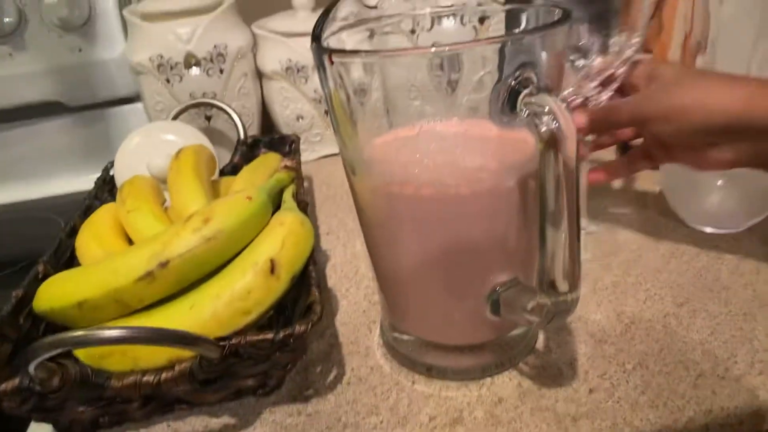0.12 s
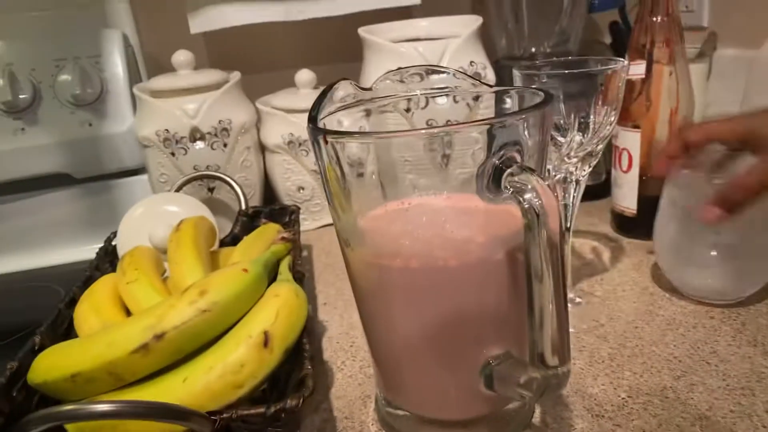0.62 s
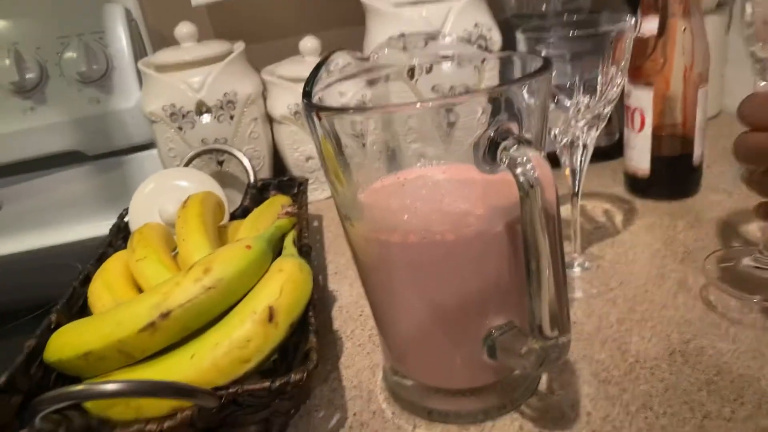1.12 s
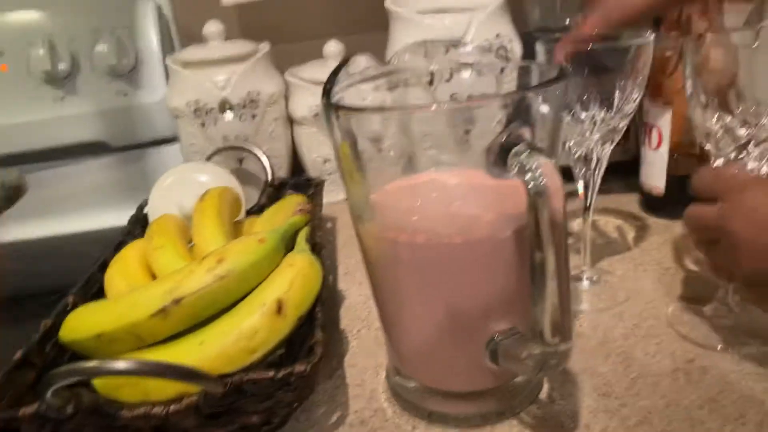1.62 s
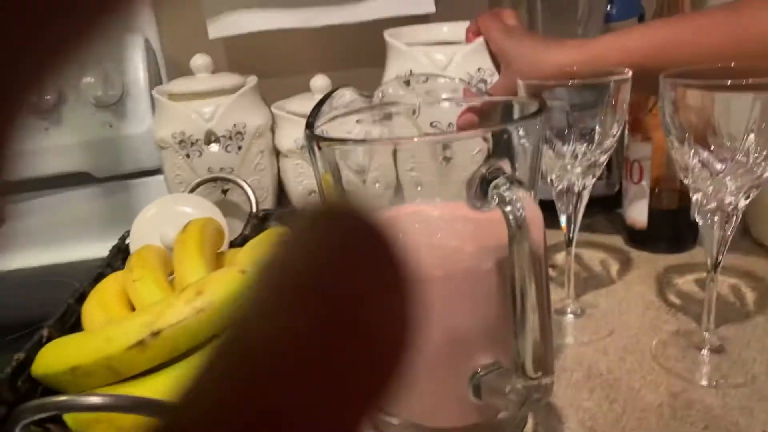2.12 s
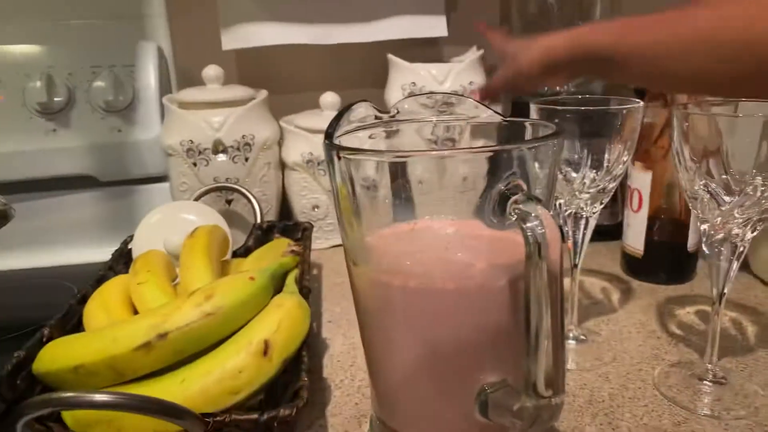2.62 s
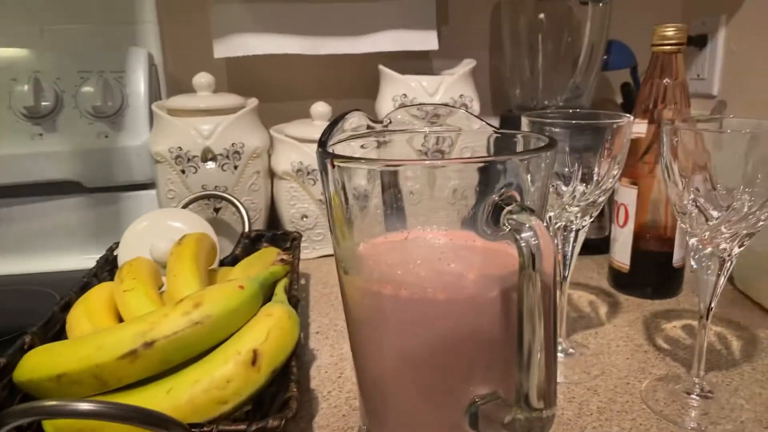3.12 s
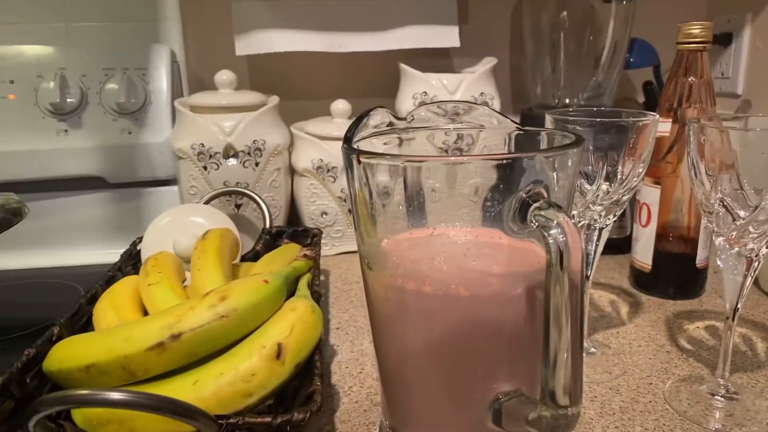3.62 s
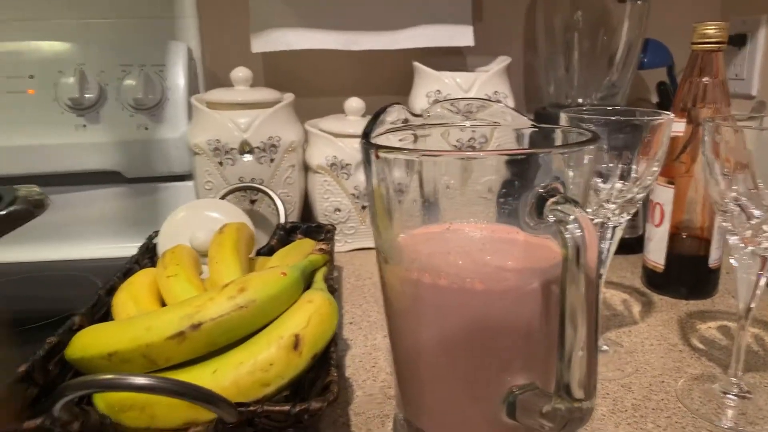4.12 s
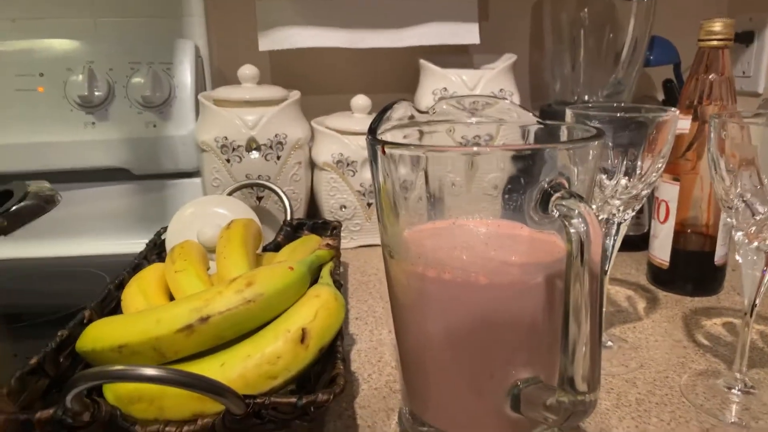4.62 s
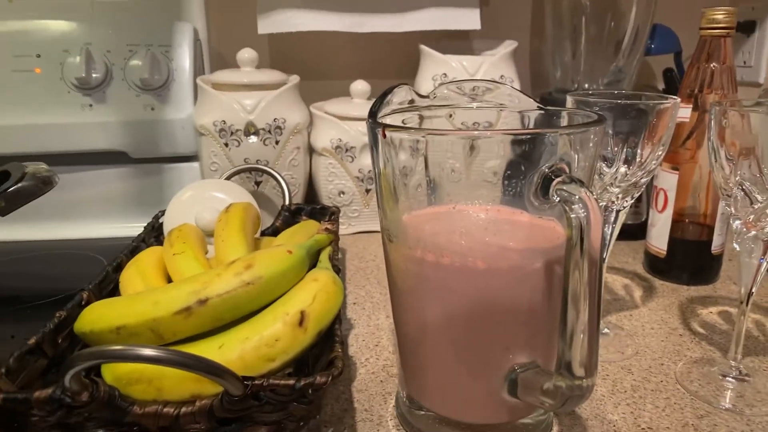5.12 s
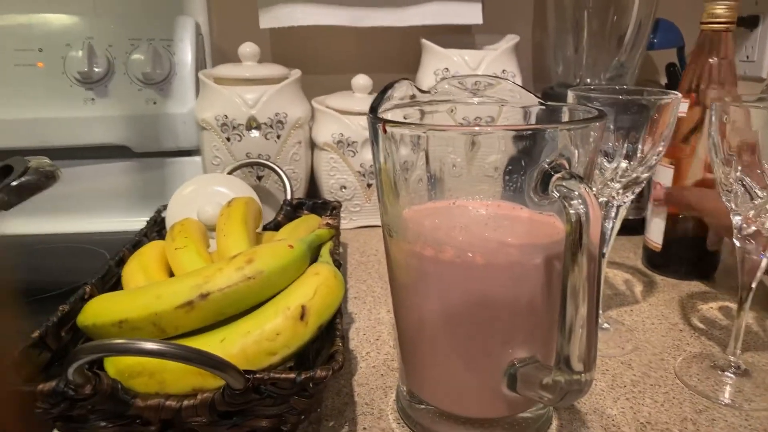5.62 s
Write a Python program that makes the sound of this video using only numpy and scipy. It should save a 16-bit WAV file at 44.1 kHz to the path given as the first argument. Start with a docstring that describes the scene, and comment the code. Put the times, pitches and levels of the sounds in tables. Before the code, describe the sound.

In a small hard kitchen, glass slides briefly on a countertop, then a bowl drags with a grainy scrape. A loud, sharp glass set-down knocks and clinks just after one second. A jar scrapes and thumps soon after two seconds. Small ticks and faint cloth rustles follow, ending with a slight bottle scrape. Close mono microphone, low appliance hum behind.

```python
"""Glassware on a kitchen counter

Close mono microphone in a small hard room: stemmed glasses, a bowl, a jar and a bottle are slid and set down.
Knocks ring the hollow counter boards and the glass; drags send stick-slip noise through each object's resonances.
Low bumps are decaying sines; dry ticks, light knocks of the bowl and rustling clothes are shaped noise.
Behind them lie coloured air noise and an appliance hum of narrow, wavering noise bands."""
import sys
import numpy as np
from scipy import signal
from scipy.fft import rfft, irfft
from scipy.io import wavfile

SR = 44100
rng = np.random.default_rng(int(sys.argv[2]) if len(sys.argv) > 2 else 0)


def to_wav(sig):
    """Store sig (one row per channel, or 1-D mono) as 16-bit WAV at the path in sys.argv[1].

    Samples outside -1..1 are clipped; the rate is SR.
    """
    pcm = np.clip(np.atleast_2d(sig), -1, 1) * 32767
    pcm = np.round(pcm).astype(np.int16)
    wavfile.write(sys.argv[1], SR, pcm.T)  # frames by channels


def gain_from_db(level_db):
    """Turn a decibel level (scalar or array-like) into a linear amplitude factor."""
    decades = np.asarray(level_db, float) / 20
    return 10 ** decades


N = 253847   # length in samples

# Levels are relative, ahead of the mix and the microphone.
# knocks on the counter: t/s, splash level/dB, thud level/dB, splash decay time/ms
KNOCKS = [(0.0214, -26.5, -26, 5), (0.1094, -24.5, -28, 10), (1.1804, -18.5, -10, 14),
          (1.1898, 10.5, -10, 1.66), (1.2381, -8, -21, 3.1), (1.2873, -15, -24.5, 4.3),
          (1.3496, -26.5, -33, 4.4), (1.404, -18, -27, 4.3), (1.4138, -13, -23.5, 4.6),
          (1.4896, -34.5, -37, 6), (1.7565, -35, -26, 2.7), (2, -29.5, -48, 8.3), (2.176, -10, -24, 10.4),
          (2.1903, -22, -23.5, 3.1), (2.4061, -10, -25, 21), (2.4145, -13, -29, 2.4),
          (2.6235, -23, -54, 10.3), (2.64, -44, -20, 5), (2.6998, -52, -20, 5), (2.7384, -24.5, -58, 4.3),
          (2.8074, -36, -32.5, 10), (2.9018, -38.5, -37.5, 9.3), (2.9582, -53, -51, 5.8),
          (4.2495, -36.5, -55, 44), (4.8769, -32, -51, 25), (5.089, -43.5, -45, 13), (5.468, -43, -40, 5),
          (5.5466, -29, -37, 4.4), (5.6016, -39.5, -35, 4.9)]
# modes of the hollow counter boards: f/Hz, level/dB, T60/s
COUNTER_MODES = [(66.5, -13, 0.3), (94.2, -10.5, 0.25), (151, -4.5, 0.55), (239.2, -4, 0.47),
                 (328, 1.5, 0.12), (414, -10, 0.11), (517, -16, 0.45), (560, -12, 0.42), (635.4, -5, 0.088),
                 (689, 2, 0.12), (790, -2.5, 0.14), (848, -9.5, 0.23), (882, -6.5, 0.17), (947, -5, 0.077),
                 (1056, -13, 0.12), (1192, -16.5, 0.18), (1210, -40, .12)]
# spectrum of a knock's splash: f/Hz, gain/dB
SPLASH_SPECTRUM = [(200, -6), (500, 3), (1000, -7), (2500, -5.5), (4000, -12.5), (6000, -20.5), (8000, -23),
                   (9500, -39), (12000, -25.5), (15500, -55)]
# resonances each dragged object speaks with: f/Hz, width/Hz, level/dB
GLASS_BODY = [(151, 64, 1), (728, 61, 4.5), (1183, 9.8, -14), (2015, 164, -2), (2660, 210, -15.5),
              (3400, 62, -19), (3400, 280, -21), (3870, 57, -46), (4560, 120, -9), (6340, 110, -12.5),
              (7200, 52, -29), (10700, 160, -24.5), (11660, 69, -32), (12200, 210, -27)]
BOWL_BODY = [(336.8, 14, 3.5), (574, 8.9, -3), (794, 48, -13.5), (1284, 38, -15), (1510, 29, -39),
             (1836, 42, -14), (2700, 82, -14.5), (3037, 43, -12.5), (3400, 124, -15), (3890, 140, -18),
             (4300, 340, -20.5), (5680, 350, -36), (7800, 85, -54), (12000, 1400, -42)]
JAR_BODY = [(148, 90, 0.5), (708, 53, 3.5), (2390, 150, -18), (3400, 100, -15), (4200, 1000, -26),
            (6200, 1150, -28), (12000, 3500, -29)]
BOTTLE_BODY = [(317.6, 23, 6), (608, 32, 1), (1380, 40, -18), (1784, 42, -17), (1926, 25, -18),
               (2630, 74, -17.5), (2820, 27, -7), (3430, 790, -14), (12200, 1800, -35)]
# how each object is pushed along; the jar's last rows, after 2.61 s, are the rattling tails of its knocks:
# t/s, pressure level/dB, bite (grinding over pressure) level/dB
GLASS_PUSH = [(0.0, -30.5, -6), (0.04, -28.5, -1.5), (0.052, -31.5, 3.5), (0.074, -26.5, -15),
              (0.084, -34, -4), (0.128, -21, -16), (0.24, -42.5, -24)]
BOWL_PUSH = [(0.6, -47, -14), (0.632, -24, -18.5), (0.656, -21.5, -13), (0.764, -32, -9.5),
             (0.784, -23.5, -25), (0.82, -26.5, -5), (0.846, -23.5, -18.5), (0.87, -20, -19.5),
             (0.902, -18.5, -29), (0.97, -27, -6.5), (0.978, -20, -20.5), (1.014, -45, -11),
             (1.046, -30, -12), (1.114, -48, -2.5), (1.14, -56, -23)]
JAR_PUSH = [(1.96, -62, -16), (1.996, -38, -11.5), (2.05, -35, -6.5), (2.192, -13.5, -12), (2.24, -30, -8),
            (2.386, -27, -7.5), (2.414, -16.5, -15.5), (2.46, -26, -7.5), (2.62, -46, -5.5),
            (2.644, -31, -15.5), (2.712, -53, -23), (2.736, -45, -5), (2.82, -49, -11), (2.848, -50, -35),
            (2.89, -74, -11), (2.914, -56, -31), (2.96, -56, -34)]
BOTTLE_PUSH = [(5.38, -61, -14), (5.39, -51, -17), (5.46, -41.5, -7), (5.468, -45, 9), (5.482, -30, -2.5),
               (5.538, -33.5, -17), (5.552, -29, -22), (5.612, -40, -16), (5.65, -74, -5), (5.67, -58, -18),
               (5.68, -67, -29)]
# balance of each drag at 0 dB bite: boom level/dB, rasp level/dB, grind level/dB, hiss level/dB
GLASS_BALANCE = (-4.5, 3.5, -1, -16)
BOWL_BALANCE = (0, -4, -2.5, -22)
JAR_BALANCE = (-3, -4, -3, -19)
BOTTLE_BALANCE = (-1, -2, -1, -23)
# share of the bite that reaches each range: boom, rasp, grind, hiss (plain factors)
BITE_SHARE = (0.05, 0.42, 0.91, 0.94)
# broad friction colour: f/Hz, gain/dB
FRICTION_SPECTRUM = [(35, -40), (60, -38), (152, 0.5), (192, -6), (298, -5.5), (343, 1.5), (403, -31),
                     (673, -2.5), (1070, -11.5), (3420, -27.5), (15500, -104)]
# strikes on the glass: t/s, level/dB, chatter decay time/ms
CLINKS = [(0.0214, -41, 3.0), (0.0278, -27, 2.7), (0.0508, -30, 2.7), (0.086, -29, 3.0), (0.1344, -44, 2.7),
          (1.1899, -3.5, 5.9), (1.2395, -24, 3.0), (1.2625, -21, 2.2), (1.4047, -24.5, 3.7),
          (1.4114, -25.5, 2.2)]
# cut glass, modes in close families: f/Hz, level/dB, T60/s
GLASS_MODES = [(1960, -10.5, 0.087), (2044, -5, 0.095), (2086, -13.5, .16), (2155, -7, 0.055),
               (2196, 4, 0.033), (2240, -9, 0.13), (2285, -11, 0.13), (2290, -8, 0.18), (2365, -2, 0.047),
               (2450, -13, 0.058), (2536, -14.5, 0.11), (2953, -11, 0.068), (3060, -12, 0.066),
               (3530, -17, .06), (4100, -26, .06), (4460, -11, 0.19), (4480, -13.5, 0.11), (4530, -11, .08),
               (4700, -14, 0.053), (6320, -18.5, 0.15), (6300, -19, 0.066), (6610, -14.5, 0.11),
               (6690, -13.5, 0.072), (6800, -14.5, 0.072), (7400, -31, .04), (7800, -35, .04),
               (10740, -29, .14), (10900, -31, .1), (12150, -32, .1), (12500, -35, 0.12)]
# soft heavy bumps felt through the counter: t/s, level/dB, f/Hz, T60/s
BUMPS = [(0.127, -47, 151, 0.17), (1.197, -17, 148, 0.088), (1.754, -27, 120, 0.084),
         (2.049, -33, 180, 0.14), (2.18, -15, 172, 0.083), (2.448, -26.5, 130, 0.11),
         (2.548, -33.5, 96, 0.25), (2.64, -24.5, 158.3, 0.25), (2.698, -25, 118, 0.14),
         (2.779, -32, 127, 0.15), (2.849, -41, 104, 0.12), (2.947, -43, 143, 0.12), (5.088, -36, 54, 0.22)]
# small dry ticks, and light knocks of the bowl as it is dragged (0.8 to 0.97 s):
# t/s, peak level/dB, centre f/Hz, decay time/ms
TICKS = [(0.621, -36, 2300, 3.5), (0.65, -25.5, 2580, 3.1), (0.802, -29, 3430, 1.9),
         (0.815, -23.5, 3400, 3.2), (0.869, -24, 2700, 10), (0.926, -39, 5330, 1.8),
         (0.941, -25.5, 4200, 3.4), (0.966, -30, 4500, 1.9), (1.0368, -27, 1830, 3.9),
         (1.285, -21, 3430, 3.2), (1.731, -44, 3600, 1.9), (1.825, -59, 2280, 1.2), (2.619, -34, 9500, 1.9),
         (2.6255, -34, 9000, 2.6), (2.7405, -41, 12000, 3.1), (2.801, -47, 11500, 2.4),
         (3.175, -42, 2280, 2.6), (3.26, -42, 2320, 1.5), (3.3249, -28, 4850, 0.93),
         (3.5382, -33.5, 2280, 4.5), (4.039, -44, 4660, 1.9), (4.6274, -23, 5370, 1.5),
         (4.6342, -24, 5300, 4.4), (4.6445, -26, 4500, 4.3), (4.745, -41.5, 6000, 5.1),
         (4.876, -25, 3170, 9.9), (4.933, -34, 6500, 3.2), (5.1899, -40, 3030, 9.5),
         (5.3294, -57, 2510, 1.5), (5.4174, -38, 2750, 1.5), (5.467, -18, 3460, 2.7)]
# clothes moving: start t/s, hold time/s, level/dB, brightness (hiss over swish) level/dB
RUSTLES = [(0.282, 0.17, -64, -1.5), (0.504, 0.09, -68, -1), (1.29, 0.028, -48.5, 5),
           (1.38, 0.052, -71, 12), (1.732, 0.05, -63, -4), (1.815, 0.04, -64.5, 2), (2.637, 0.0092, -54, 1),
           (2.736, 0.012, -59, 3), (2.8, 0.018, -66, 4), (2.986, 0.091, -66.5, -2), (3.154, 0.087, -77, 8),
           (3.323, 0.027, -56, 0.5), (3.387, 0.075, -55.5, 8), (3.497, 0.1, -61, 0), (3.717, 0.1, -57, 4),
           (3.924, 0.088, -59, 5), (4.044, 0.11, -66.5, -8), (4.289, 0.094, -54.5, 3),
           (4.433, 0.04, -57.5, -1.5), (4.618, 0.024, -65, -2), (4.743, 0.05, -67.5, -8),
           (4.889, 0.05, -58, -16.5), (4.94, 0.11, -56.5, -7), (5.173, 0.04, -61.5, -12.5),
           (5.325, 0.02, -67.5, -17), (5.43, 0.04, -58, -7), (5.47, 0.088, -63, -1), (5.6, 0.1, -75, -16)]
# spectrum of the room air: f/Hz, gain/dB
AIR_SPECTRUM = [(12, -60), (20, -79), (49, -6), (87, -7.5), (196, -3.5), (266, -0.5), (416, -7.5),
                (478, -8), (581, -13.5), (649, -14), (985, -18), (2840, -23.5), (4950, -35), (13900, -45),
                (15500, -75)]
# appliance hum: f/Hz, rms level/dB
HUM = [(59.2, -62), (134.6, -55), (199.2, -50.5), (269.2, -51.5), (328.4, -59), (468.3, -66),
       (646.0, -61.5), (705.2, -65.5)]
# reverberation of the room: f/Hz, T60/s
ROOM_T60 = [(100, 0.36), (1000, 0.51), (4000, 0.29), (14000, 0.28)]


def rms_one(x):
    """Scale to unit rms."""
    return x / np.sqrt(np.mean(x ** 2) + 1e-20)


def in_time(rows):
    """Columns of a curve at every sample, at -150 dB outside it."""
    s, *columns = np.transpose(rows)
    return [np.interp(np.arange(N) / SR, s, c, left=-150, right=-150) for c in columns]


def at_hz(points, hz):
    """Read a two-column table on a log-frequency axis."""
    table_hz, values = np.transpose(points)
    return np.interp(np.log(hz + 1), np.log(table_hz), values)


def colour(x, spectrum):
    """Filter noise to a spectrum by weighting its frequency bins."""
    bins_hz = np.linspace(0, SR / 2, len(x) // 2 + 1)
    return irfft(rfft(x) * gain_from_db(at_hz(spectrum, bins_hz)), len(x))


def cut(x, hz, kind):
    """Butterworth low, high or band pass of design order four."""
    return signal.sosfilt(signal.butter(4, hz, kind, fs=SR, output="sos"), x)


def drift(knots_per_s):
    """Slow random wander: straight lines between normal draws of spread 1."""
    knots = rng.standard_normal(400)
    return np.interp(np.arange(N) / SR * knots_per_s, np.arange(len(knots)), knots)


def resonate(x, hz, width):
    """A two-pole resonance of about unit gain at its peak."""
    r = np.exp(-np.pi * width / SR)
    poles = [1, -2 * r * np.cos(2 * np.pi * hz / SR), r * r]
    return signal.lfilter([(1 - r * r) / 2, 0, (r * r - 1) / 2], poles, x)


def ring(x, hz, t60):
    """A damped mode: a unit click starts a decaying sine of height 1."""
    r = gain_from_db(-60 / (t60 * SR))
    w = 2 * np.pi * hz / SR
    return signal.lfilter([0, np.sin(w)], [1, -2 * r * np.cos(w), r * r], x + 1e-18)


def ring_modes(x, modes):
    """Modes of one body ring together, in alternating polarity."""
    return sum((-1) ** k * gain_from_db(db) * ring(x, hz, t60) for k, (hz, db, t60) in enumerate(modes))


def grit(per_s, spread_db):
    """Stick-slip clicks of uneven size over a little smooth noise."""
    sizes = gain_from_db(spread_db * np.minimum(rng.exponential(1, N), 5)) * rng.choice([-1, 1], N)
    clicks = sizes * (rng.random(N) < per_s / SR)
    return rms_one(clicks) + 0.5 * rng.standard_normal(N)


def judders(events):
    """Noise bursts from (t/s, level/dB, decay time/ms) that rise within 1.5 ms and die exponentially."""
    out, t = np.zeros(N + 3000), np.arange(3000) / SR
    for (s, db, ms), noise in zip(events, rng.standard_normal((len(events), len(t)))):
        at = round(s * SR)
        out[at:at + len(t)] += gain_from_db(db) * noise * np.minimum(t / 0.0015, 1) * np.exp(-1000 * t / ms)
    return out[:N]


def knocks():
    """A rounded push rings the boards beside a dying splash; the duller the knock, the longer the contact."""
    thud = np.zeros(N)
    for s, splash_db, thud_db, _ in KNOCKS:
        contact_s = np.clip(0.0016 * gain_from_db(1.73 * (thud_db - splash_db)), 0.0003, 0.012)
        push = np.hanning(3 + int(contact_s * SR))
        at = round(s * SR)
        thud[at:at + len(push)] += gain_from_db(thud_db) * push / push.sum()
    boards = ring_modes(thud, COUNTER_MODES)
    splash = judders([(s, splash_db, ms) for s, splash_db, _, ms in KNOCKS])
    return boards + gain_from_db(3.0) * colour(splash, SPLASH_SPECTRUM)


def drag(push, balance_db, body, broad_db, grains_per_s):
    """Friction drives resonances that come and go as the contact shifts; bite brightens the drag."""
    rub = grit(grains_per_s, spread_db=1.5)
    sound = gain_from_db(broad_db) * colour(rub, FRICTION_SPECTRUM)
    for k, (hz, width, db) in enumerate(body):
        shift_db = 4.5 * drift(22.0) * (hz > 250)   # the lowest resonances hold steady
        sound = sound + (-1) ** k * gain_from_db(db + shift_db) * resonate(rub, hz, width)
    # boom, rasp, grind and hiss, each levelled before the push shapes it
    ranges = [(480, "low"), ([480, 1400], "band"), ([1400, 8000], "band"), (8000, "high")]
    pressure_db, bite_db = in_time(push)
    out = np.zeros(N)
    for db, share, (hz, kind) in zip(balance_db, BITE_SHARE, ranges):
        out += gain_from_db(pressure_db + db + share * bite_db) * rms_one(cut(sound, hz, kind))
    return out


def drags():
    """Glass, bowl, jar and bottle slide, each with its own body; the jar's friction grain is sparser."""
    glass = drag(GLASS_PUSH, GLASS_BALANCE, GLASS_BODY, broad_db=-3.5, grains_per_s=1500.0)
    bowl = drag(BOWL_PUSH, BOWL_BALANCE, BOWL_BODY, broad_db=-9.5, grains_per_s=1500.0)
    # the jar's knocks rattle on through the same body
    jar = drag(JAR_PUSH, JAR_BALANCE, JAR_BODY, broad_db=0.24, grains_per_s=1200.0)
    bottle = drag(BOTTLE_PUSH, BOTTLE_BALANCE, BOTTLE_BODY, broad_db=-5.0, grains_per_s=1500.0)
    return glass + bowl + jar + bottle


def clinks():
    """The glass rings after a sharp touch of its foot, a short chatter and a longer buzz as it settles."""
    settle_db, settle_t60_s = -43.5, 0.26   # the foot goes on buzzing against the counter
    strikes = np.zeros(N)
    for s, db, _ in CLINKS:
        strikes[round(s * SR)] += gain_from_db(db)
    settling = signal.lfilter([1], [1, -gain_from_db(-60 / (settle_t60_s * SR))], strikes + 1e-18)
    buzz = gain_from_db(settle_db) * settling * grit(per_s=990.0, spread_db=1.0)
    chatter = gain_from_db(-40.0) * judders(CLINKS)
    return ring_modes(gain_from_db(-6.0) * strikes + chatter + buzz, GLASS_MODES)


def bumps():
    """A low sine that swells for half a cycle and dies."""
    out, t = np.zeros(N), np.arange(SR // 3) / SR
    for s, db, hz, t60 in BUMPS:
        at = round(s * SR)
        swell = np.minimum(2 * hz * t, 1)
        out[at:at + len(t)] += gain_from_db(db - 60 * t / t60) * swell * np.sin(2 * np.pi * hz * t)
    return out


def ticks_and_bowl_knocks():
    """Each tick or light knock of the bowl is a dying click of noise resonating around its own pitch."""
    edge_share, body_share = 0.02, 0.03   # bright edge and broad body around the pitch
    out, t = np.zeros(N), np.arange(900) / SR
    draws = rng.standard_normal((len(TICKS), len(t)))
    for (s, db, hz, ms), noise in zip(TICKS, draws):
        burst = noise * np.exp(-1000 * t / ms)
        tick = resonate(burst, hz, 0.35 * hz)
        tick = tick + edge_share * np.diff(burst, prepend=0) + body_share * burst
        at = round(s * SR)
        out[at:at + len(t)] += gain_from_db(db) * tick / np.abs(tick).max()
    return out


def room(x):
    """A diffuse noise tail in octave bands, each dying at its own rate."""
    t = np.arange(SR) / SR
    lows = 50 * 2. ** np.arange(9)
    highs = [*lows[1:], 19000]
    tail = np.zeros(SR)
    for lo, hi in zip(lows, highs):
        t60 = at_hz(ROOM_T60, np.sqrt(lo * hi))
        tail += cut(rng.standard_normal(SR), [lo, hi], "band") * gain_from_db(-60 * t / t60)
    tail = tail * np.minimum(t / 0.016, 1)   # the echo builds up over 16 ms
    return signal.fftconvolve(x, tail / np.sqrt(np.sum(tail ** 2)))[:N]


def rustle():
    """Fine cloth noise in a bright and a middle range; each movement swells, holds and fades."""
    rise_db_per_s, fall_db_per_s = 458, 178
    fine, coarse = grit(per_s=5600.0, spread_db=2.5), grit(per_s=4600.0, spread_db=2.5)
    hiss = rms_one(cut(fine, 9500, "high"))
    swish = rms_one(cut(coarse, [2500, 7220], "band"))
    t, hiss_power, swish_power = np.arange(N) / SR, np.zeros(N), np.zeros(N)
    for s, length, db, bright_db in RUSTLES:
        early, late = np.maximum(s - t, 0), np.maximum(t - s - length, 0)
        power = gain_from_db(2 * (db - rise_db_per_s * early - fall_db_per_s * late))
        hiss_power += power * gain_from_db(bright_db)
        swish_power += power / gain_from_db(bright_db)
    return np.sqrt(hiss_power) * hiss + np.sqrt(swish_power) * swish


def background():
    """Coloured room air, and an appliance hum of noise in narrow resonances that make it waver."""
    air_db = -47 + 0.09 * drift(6.17)
    air = gain_from_db(air_db) * rms_one(colour(rng.standard_normal(N), AIR_SPECTRUM))
    white = rng.standard_normal(N)
    hum = sum(gain_from_db(db) * rms_one(resonate(white, hz, 3.14)) for hz, db in HUM)
    return air + hum


def scene():
    """Everything on the counter with its echo, then clothes and the steady room."""
    near = knocks() + drags() + clinks() + bumps() + ticks_and_bowl_knocks()
    return (near + gain_from_db(-11.0) * room(near) + rustle() + background())[None]


def roll_off(x):
    """The treble ends steeply here."""
    return signal.sosfilt(signal.butter(12, 16590, fs=SR, output="sos"), x)


def record(dry):
    """The microphone drops the deep bass and the very top; between the two, peaks are rounded."""
    heard = 0.88 * np.tanh(cut(dry, 47.4, "high") / 1.037)
    # steep low pass at 15.8 kHz: 0.5 dB ripple, 60 dB rejection
    heard = signal.sosfilt(signal.ellip(10, 0.5, 60, 15800, fs=SR, output="sos"), heard)
    return roll_off(heard)


dry = scene()
out = record(dry)
to_wav(out)
```